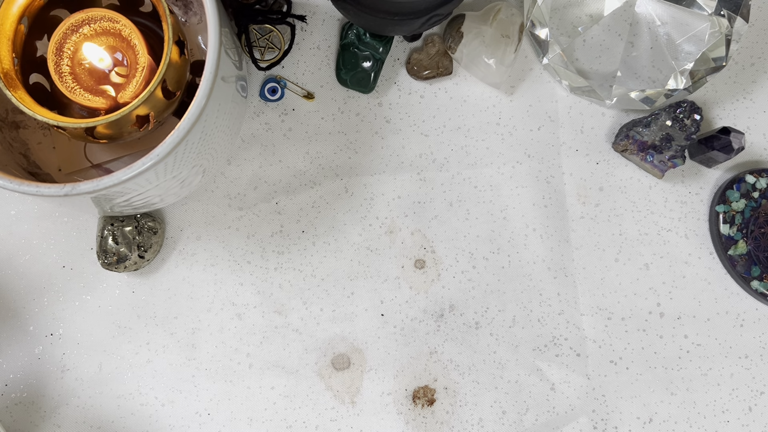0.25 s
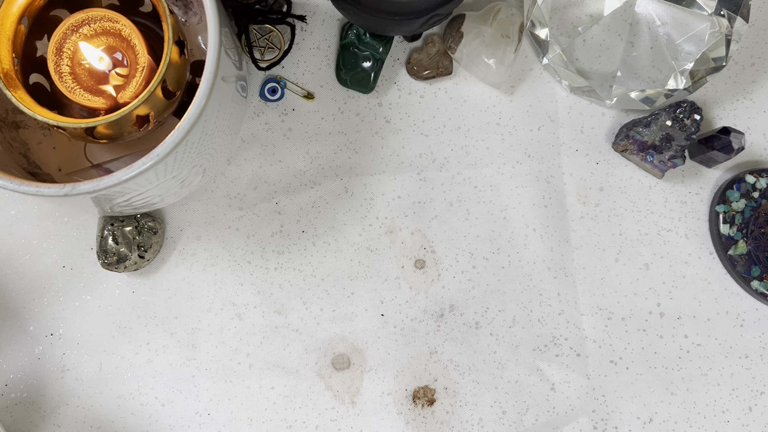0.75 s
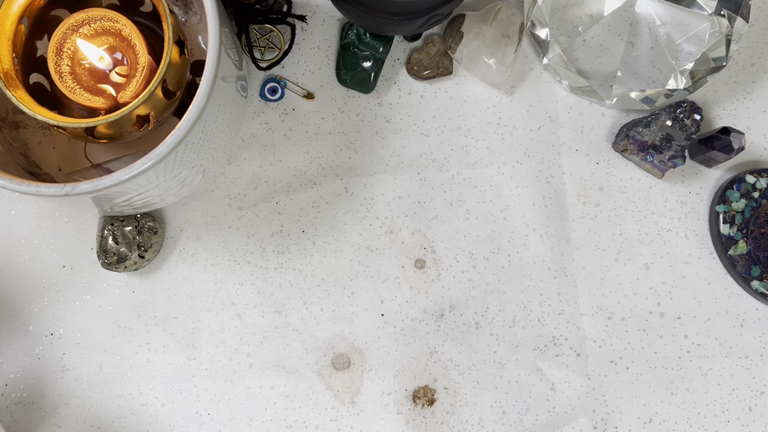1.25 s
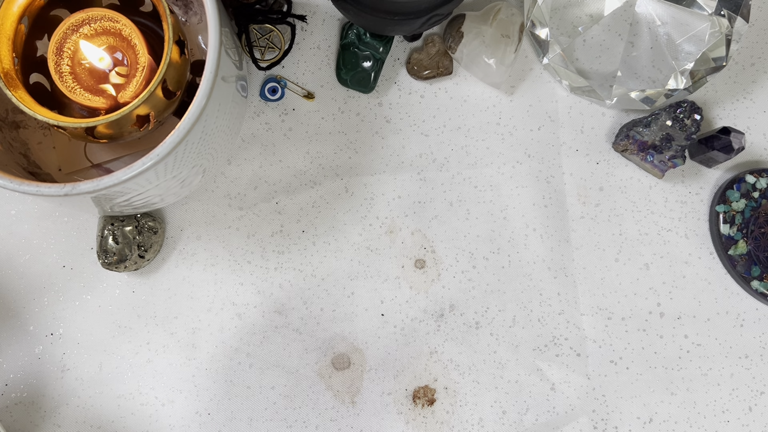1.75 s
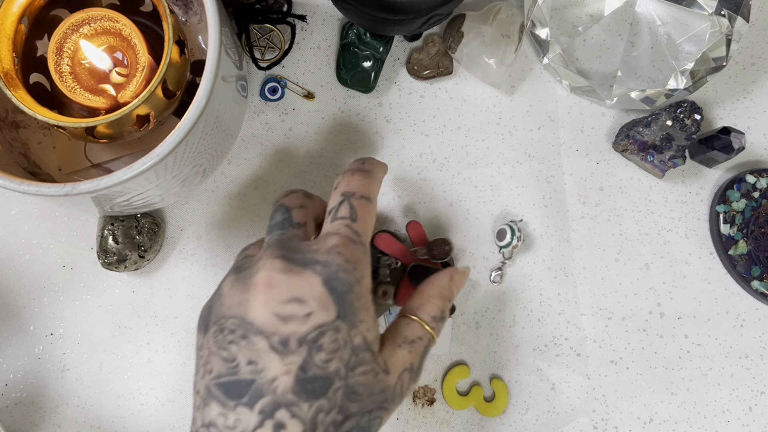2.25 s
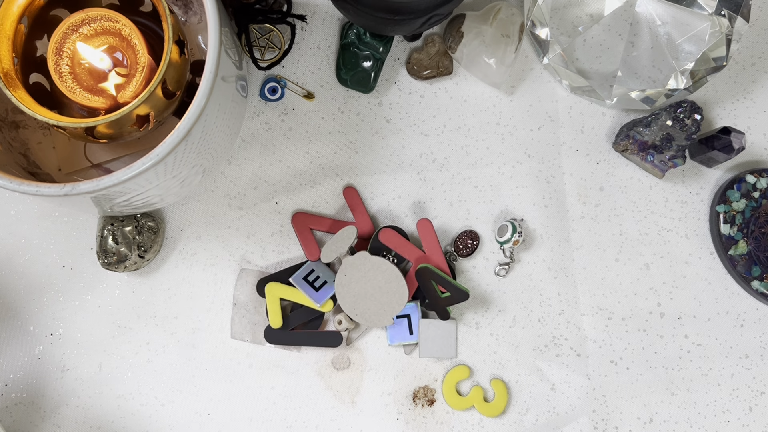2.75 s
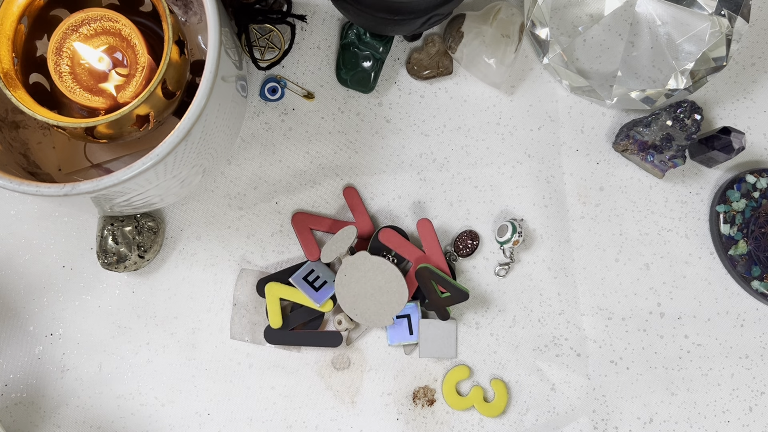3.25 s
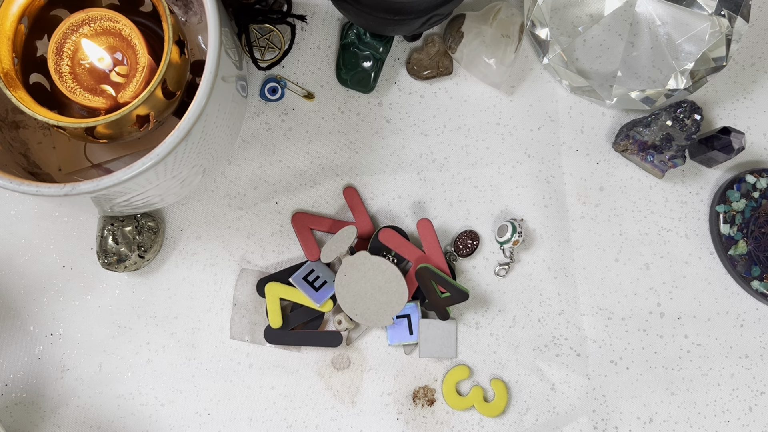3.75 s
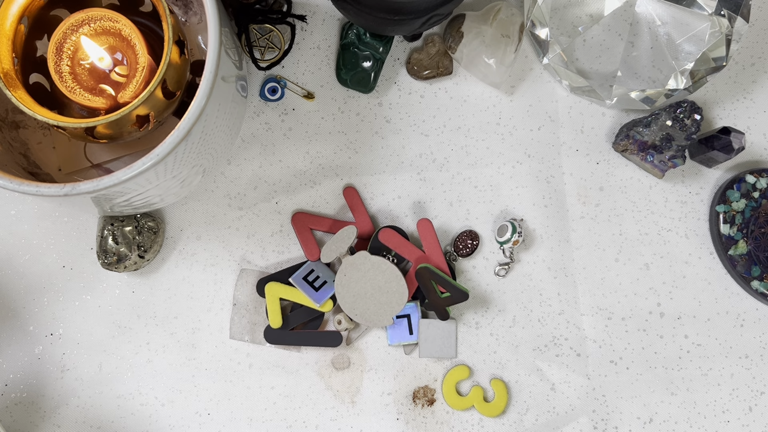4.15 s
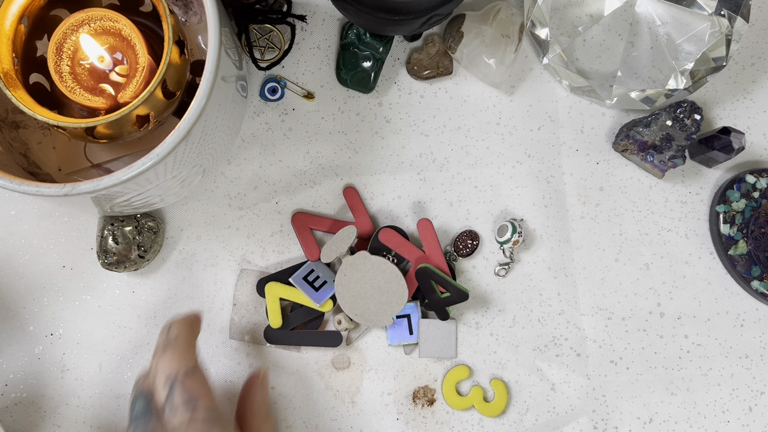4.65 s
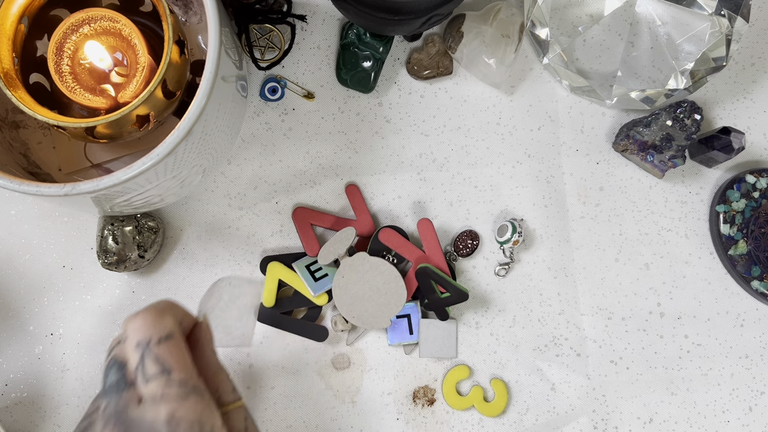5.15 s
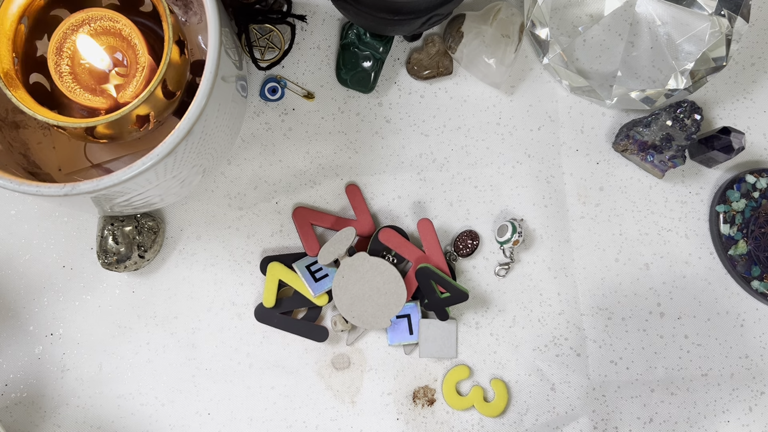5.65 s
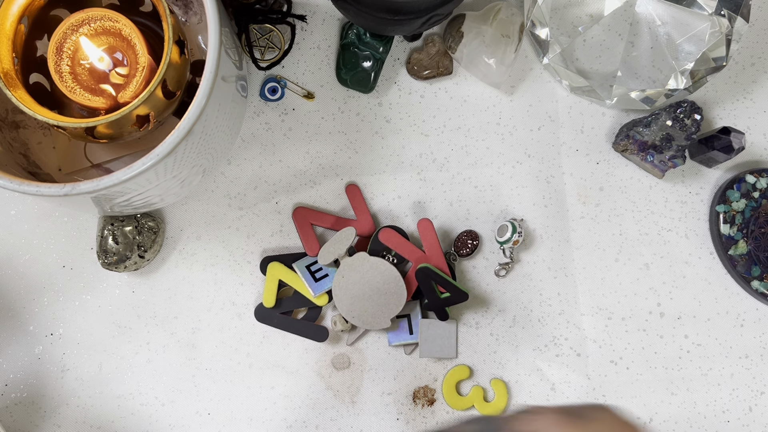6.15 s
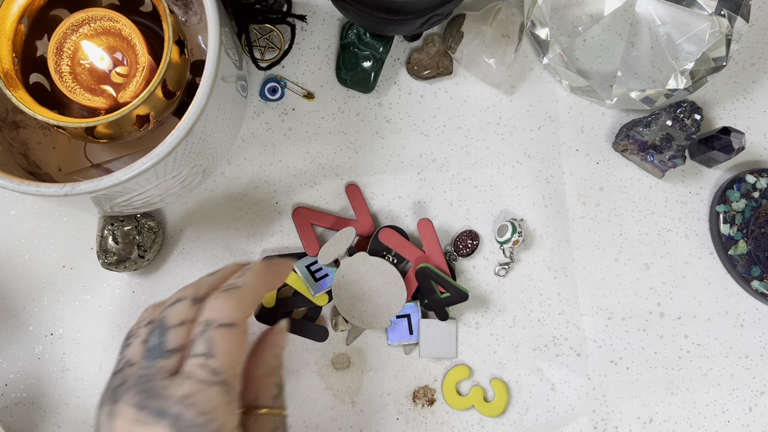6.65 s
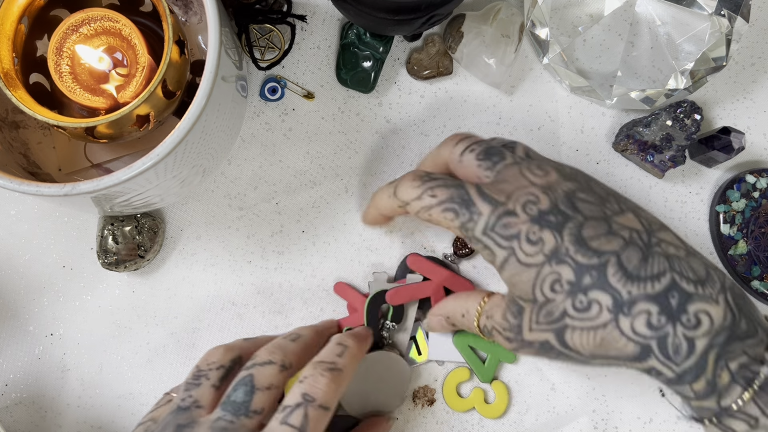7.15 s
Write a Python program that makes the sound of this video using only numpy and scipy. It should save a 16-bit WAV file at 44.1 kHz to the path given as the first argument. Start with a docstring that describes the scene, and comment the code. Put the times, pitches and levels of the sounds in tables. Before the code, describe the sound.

Close up in a small room, a hand stirs plastic letters and metal charms in a ringing bowl, bright and dense, thinning into separate clinks. A firm dull knock hits the table and pieces spill with dry clicks and a thin crinkle. Faint bowl clinks follow, then a short metallic clatter. A piece slides softly aside, and finally both hands spread the pile with clicks and low rubbing. Close stereo microphone, faint hum.

```python
"""Stirring letters and charms

A hand stirs plastic letters and metal charms in a ringing bowl, knocks down on a hard table and lets a handful go.
Charms clink in the bowl, a metal piece clatters down, a tile is slid aside and both hands spread the pile.
Clicks and noise bursts ring damped modes; sliding is dense random slips; rubbing is coloured noise.
A small room with a hum, a close stereo microphone."""
import sys
import numpy as np
from scipy import signal
from scipy.fft import rfft, irfft, next_fast_len
from scipy.io import wavfile

SR = 44100
rng = np.random.default_rng(int(sys.argv[2]) if len(sys.argv) > 2 else 0)


def master(y):
    """Save y as 16-bit WAV."""
    cut = np.clip(np.atleast_2d(y).T, -1, 1)
    pcm = np.round(cut * 32767)  # scale
    wavfile.write(sys.argv[1], SR, pcm.astype(np.int16))


N = 325714
TIME = np.arange(N) / SR


def from_db(db):
    """Decibels to gain."""
    return 10 ** (np.asarray(db) / 20)


def rms_one(x):
    """Scale to rms 1."""
    return x / np.sqrt(np.mean(x ** 2) + 1e-20)


def peak_at(x, db):
    """Scale to a peak level."""
    return from_db(db) * x / np.abs(x).max()


def at_hz(points, hz):
    """Read a table on a log-frequency axis."""
    knots, values = np.transpose(points)
    return np.interp(np.log(hz + 1e-3), np.log(knots), values)


def add(out, start_s, sound):
    """Mix a sound in at a time."""
    i = max(int(start_s * SR), 0)
    out[i:i + len(sound)] += sound[:max(N - i, 0)]


def butter(x, order, hz, kind="low"):
    """Butterworth filter."""
    return signal.sosfilt(signal.butter(order, hz, kind, fs=SR, output="sos"), x)


def colour(x, points):
    """Causal (minimum-phase) filter with the given dB response."""
    size = 2 * next_fast_len(N // 2 + 4096)
    log_gain = np.log(from_db(at_hz(points, np.fft.rfftfreq(size, 1 / SR))))
    cepstrum = irfft(log_gain)
    # fold onto positive time
    cepstrum[1:size // 2] *= 2
    cepstrum[size // 2 + 1:] = 0
    return irfft(rfft(x, size) * np.exp(rfft(cepstrum)))[..., :N]


def tilt(x, tilt_db):
    """Split at 5 kHz: lower part down by twice tilt_db, upper part up by as much."""
    low = butter(x, 1, 5000)
    return low * from_db(-2 * tilt_db) + (x - low) * from_db(2 * tilt_db)


def ring(x, hz, t60_s):
    """Two-pole resonator: a unit click sets a decaying sine of height 1 ringing."""
    radius = from_db(-60 / (t60_s * SR))
    w = 2 * np.pi * hz / SR
    return signal.lfilter([0, np.sin(w)], [1, -2 * radius * np.cos(w), radius ** 2], x + 1e-18)


def burst(t60_s, length_s):
    """A crack of noise that dies away."""
    t = TIME[:int(length_s * SR)]
    return rng.standard_normal(len(t)) * from_db(-60 * t / t60_s)


def contacts(per_s, spread_db):
    """Random tiny collisions; strength in dB is exponential, most weak and a few strong."""
    sizes = from_db(spread_db * np.minimum(rng.exponential(1, N), 4))
    signs = rng.choice([-1, 1], N)
    return sizes * signs * (rng.random(N) < per_s / SR)


def flutter(per_s, depth_db):
    """A gain that wanders at random."""
    knots = rng.standard_normal(1024)
    return from_db(depth_db * np.interp(TIME * per_s, np.arange(len(knots)), knots))


def stroke(start_s, end_s, attack_s, fade_db_per_s):
    """An envelope that rises, holds to the end and then fades."""
    rise = np.clip((TIME - start_s) / attack_s, 0, 1)
    return rise * from_db(-fade_db_per_s * np.maximum(TIME - end_s, 0))


# room air spectrum: [hz, level_db]
AIR_COLOUR = [(15, -53.5), (25, -26.5), (41, -10.5), (64, -12), (78, -5.5), (97, -22), (394, -34.5),
              (489, -36), (531, -35), (988, -47), (1190, -49), (1480, -51.5), (2220, -46), (2760, -52.5),
              (16000, -59.5)]


def room_tone(air_db=-65, side_db=-5, hum_db=-66):
    """Low building rumble, a wavering hum and faint hiss."""
    mid, side = (rms_one(colour(rng.standard_normal(N), AIR_COLOUR)) for _ in range(2))
    side = butter(side, 1, 300, "high")
    air = mid + from_db(side_db) * side * [[1], [-1]]
    hum = np.sqrt(2) * np.sin(2 * np.pi * 59.5 * TIME) * flutter(per_s=6, depth_db=2.5)
    return from_db(air_db) * air + from_db(hum_db) * hum


# stirring vigour: [time_s, level_db]
STIR = [(0.0, -37), (0.048, -37), (0.14, -43.5), (0.202, -39), (0.484, -46.5), (0.854, -48), (0.92, -58.5)]
# plastic rattle spectrum: [hz, level_db]
PLASTIC_COLOUR = [(150, -38.5), (400, -12.5), (900, -12.5), (1800, -1.5), (2600, -4.5), (4500, -4.5),
                  (6500, -1.5), (9000, 0), (16000, -6)]
# small charm modes: [pitch_hz, level_db, t60_s]
CHARMS = [(6410, -8.5, 0.058), (7160, -3.5, 0.015), (7600, 0.5, 0.016), (7930, -5, 0.012),
          (8124, -7.5, 0.0043), (9300, -4, 0.0067), (11690, 1, 0.022), (11260, -10.5, .02),
          (14600, -1, 0.0072), (15550, -25, 0.0029)]
# bowl modes: [pitch_hz, level_db, t60_s]
BOWL = [(400, -19, .9), (964, -9, .16), (1766, -3, .12), (2790, -5, .12), (3950, -2, .11), (5243, -3, .11),
        (5905, -10, .1), (6690, -5, .1), (7133, -5, .1), (8180, -5, .11), (11670, -5, .09)]
SETTLE_DB_PER_S, REST_S, REST_DB_PER_S = 14.5, 1.21, 210   # after the last STIR point, then coming to rest
LETTERS_DB, BOWL_DB = 4.5, -13   # above the vigour
JINGLE_START_DB, JINGLE_DB_PER_DB = -30.5, 1.5   # charms' first level, dB lost per dB of vigour


def stirring(crack_db=-3):
    """Clumped letter collisions ring briefly, each at its own pitch; charms jingle and the bowl sings along."""
    time_s, level_db = np.transpose(STIR)
    settle_db = SETTLE_DB_PER_S * np.maximum(TIME - time_s[-1], 0)
    rest_db = REST_DB_PER_S * np.maximum(TIME - REST_S, 0)
    vigour = from_db(np.interp(TIME, time_s, level_db) - settle_db - rest_db)

    clicks = contacts(per_s=3500, spread_db=3.0) * flutter(per_s=120, depth_db=1.0)
    pitches_hz = np.linspace(1400, 15000, 26)
    dealt = rng.integers(0, len(pitches_hz), N)
    pieces = sum(ring(clicks * (dealt == k), hz, t60_s=0.004) for k, hz in enumerate(pitches_hz))
    rattle = rms_one(pieces) + from_db(crack_db) * clicks / clicks.std()
    letters = vigour * rms_one(colour(rattle, PLASTIC_COLOUR))

    jingle = sum(from_db(db) * rms_one(ring(contacts(per_s=450, spread_db=6.0), hz, t60_s))
                 for hz, db, t60_s in CHARMS)
    charms = (vigour / vigour[0]) ** JINGLE_DB_PER_DB * rms_one(jingle)
    bowl = vigour * rms_one(sum(from_db(db) * ring(clicks, hz, t60_s) for hz, db, t60_s in BOWL))
    return from_db(LETTERS_DB) * letters + from_db(JINGLE_START_DB) * charms + from_db(BOWL_DB) * bowl


# ringing charms: (pitch_hz, t60_s)
LOW_CHARM, MID_CHARM, HIGH_CHARM, TINY_CHARM = (7170, 0.043), (11600, 0.033), (12160, 0.21), (14930, 0.135)
# struck charms: [start_s, peak_db, charm]
PINGS = [(.002, -21, LOW_CHARM), (.107, -23.5, HIGH_CHARM), (.157, -21, HIGH_CHARM),
         (.262, -26.5, HIGH_CHARM), (0.291, -22, TINY_CHARM), (0.3212, -25, MID_CHARM),
         (0.371, -27, HIGH_CHARM), (0.645, -26, LOW_CHARM), (0.698, -22.5, LOW_CHARM),
         (0.8012, -28.5, LOW_CHARM), (0.915, -31.5, LOW_CHARM), (0.9402, -28, MID_CHARM),
         (1.111, -26, LOW_CHARM), (1.1343, -28, MID_CHARM), (3.377, -46, LOW_CHARM),
         (3.7713, -56.5, MID_CHARM), (3.8242, -50.5, MID_CHARM), (3.9051, -36.5, LOW_CHARM),
         (3.941, -38.5, MID_CHARM)]


def pings(crack=0.07, partner_db=-18, partner_ratio=1.8, rebound=.1, rebound_t60_s=0.023):
    """A struck charm rebounds quickly: a crack, one main mode and a weaker partner above or below it."""
    out = np.zeros(N)
    for start_s, peak_db, (hz, t60_s) in PINGS:
        click = signal.unit_impulse(SR // 2) + rebound * burst(rebound_t60_s, length_s=1)[:SR // 2]
        partner_hz = hz * partner_ratio if hz < 9500 else hz / partner_ratio
        main = peak_at(ring(click, hz, t60_s), 0)
        partner = peak_at(ring(click, partner_hz, t60_s / 2), partner_db)
        noise = crack * burst(0.01, length_s=.5)[:len(click)]
        add(out, start_s, peak_at(main + partner + noise, peak_db))
    return out


# charms buzzing together: [start_s, end_s, rms_db, pitch_hz]
BUZZES = [(0.206, 0.335, -38.5, 14750), (0.935, 0.961, -35, 7560), (0.97, 1.057, -48.5, 7530),
          (0.985, 1.05, -51, 11300), (3.212, 3.29, -54, 5770), (3.284, 3.35, -61.5, 11700),
          (3.878, 3.95, -55, 7140), (3.891, 3.956, -58.5, 11230), (7.301, 7.35, -54, 9300)]


def buzzes(t60_s=0.015):
    """Charms in loose contact chatter into one damped mode."""
    out = np.zeros(N)
    clicks = contacts(per_s=13000, spread_db=8.0)
    for start_s, end_s, rms_db, hz in BUZZES:
        run = clicks[int(start_s * SR):int(end_s * SR)]
        swell = signal.windows.tukey(len(run), .5)
        add(out, start_s, from_db(rms_db) * rms_one(ring(run, hz, t60_s) * swell))
    return out


def tap(peak_db, hz, tilt_db, body, body_cycles=34):
    """Plastic on plastic or table: a dry crack and a short ring."""
    crack = burst(0.014, length_s=.1) + 0.08 * burst(0.11, length_s=.1)
    body_ring = rms_one(ring(crack, hz, body_cycles / hz))
    return peak_at(rms_one(tilt(crack, tilt_db)) + body * body_ring, peak_db)


# where a piece is hit: (pitch_hz, tilt_db, ring strength)
FACE, CORNER, EDGE, TIP = (3580, -9, 1.8), (4300, 5, 0.26), (8740, 2.8, 1), (12800, 8, 0.33)
# clear taps: [start_s, peak_db before the high-pass, place]
TAPS = [(0.695, -22.5, EDGE), (0.785, -24.5, EDGE), (0.959, -17, TIP), (1.086, -26.5, TIP),
        (1.172, -26, CORNER), (1.183, -39.5, FACE), (1.196, -30, CORNER), (1.3, -50, CORNER),
        (1.712, -43.5, CORNER), (1.7785, -24.5, TIP), (2.032, -30.5, TIP), (2.091, -37.5, TIP),
        (2.1963, -25.5, FACE), (2.199, -26.5, FACE), (2.3215, -25, CORNER), (2.394, -32, CORNER),
        (3.201, -33, EDGE), (3.493, -42, TIP), (5.809, -42, FACE), (6.8971, -36, FACE),
        (6.982, -29, CORNER), (6.9997, -28.5, EDGE), (7.0624, -37, CORNER), (7.2198, -30.5, EDGE),
        (7.258, -34.5, TIP), (7.2671, -29.5, FACE), (7.321, -28, CORNER), (7.377, -19, CORNER)]
# pieces jostling under the hands: [start_s, end_s, typical peak_db before the high-pass]
JOSTLES = [(2.001, 2.57, -47), (3.148, 3.5, -59.5), (6.931, 7.392, -44)]
JOSTLES_PER_S, JOSTLE_SPREAD_DB, JOSTLE_PITCH_SPREAD = 39, 5, 0.13   # pitch spread as a share


def taps():
    """Clear taps, and fainter ones at random while the hands move the pieces; high-passed."""
    out = np.zeros(N)
    for start_s, peak_db, place in TAPS:
        add(out, start_s, tap(peak_db, *place))
    for start_s, end_s, peak_db in JOSTLES:
        for k, (late, size, pitch, pick) in enumerate(rng.random((40, 4))):
            hit_s = start_s + (k + late) / JOSTLES_PER_S
            hz, tilt_db, body = (FACE, FACE, CORNER, TIP)[int(4 * pick)]
            hit_db = peak_db + JOSTLE_SPREAD_DB * (2 * size - 1)
            hit_hz = hz * (1 + JOSTLE_PITCH_SPREAD * (2 * pitch - 1))
            add(out, hit_s, tap(hit_db, hit_hz, tilt_db, body) * (hit_s < end_s))
    return butter(out, 2, 900, "high")


# pieces skittering on the bowl: [start_s, peak_db, length_s (a third of the skitter's t60), tilt_db]
BOWL_HITS = [(0.791, -37, 0.14, 2), (0.969, -22.5, 0.0085, 6.5), (2.692, -39, 0.054, 1.5),
             (2.783, -56.5, 0.02, 0), (3.101, -52, 0.017, -1), (3.201, -44.5, 0.011, 2.5)]


def bowl_hits(crack=.4, skitter=.1):
    """A first touch and a run of smaller ones excite the bowl's modes."""
    out = np.zeros(N)
    for start_s, peak_db, length_s, tilt_db in BOWL_HITS:
        touch = signal.unit_impulse(SR) + skitter * burst(3 * length_s, length_s=1)[:SR]
        modes = sum(from_db(db) * np.sqrt(t60_s) * rms_one(ring(touch, hz, t60_s)) for hz, db, t60_s in BOWL)
        noise = crack * rms_one(burst(0.25, length_s=1)[:SR])
        add(out, start_s, peak_at(tilt(rms_one(modes) + noise, tilt_db), peak_db))
    return out


# dull blows on the table: [start_s, peak_db, cutoff_hz]
KNOCKS = [(1.812, -25, 3370), (1.941, -13, 1590), (1.985, -27, 519), (2.181, -35, 1290),
          (2.3052, -34.5, 1280), (2.381, -37.5, 590), (3.097, -53.5, 470), (4.081, -39.5, 199.7),
          (4.988, -55, 443), (5.808, -50.5, 808.5), (7.108, -38, 444)]
# table top modes: [pitch_hz, level_db, t60_s]
TABLE = [(155, -21, 0.036), (260.2, -7, 0.027), (339, -9.5, .16), (412, -7, 0.12), (511.4, -5, 0.048),
         (632.3, -4.5, 0.027), (889, -12, 0.036), (1032, -11.5, 0.069), (1483, -1, 0.012),
         (1810, -5.5, 0.037), (2370, -3, 0.029), (3430, -3.5, 0.0093)]


def knocks():
    """A soft contact is a low-passed blow on the table's modes."""
    out = np.zeros(N)
    for start_s, peak_db, cutoff_hz in KNOCKS:
        click = signal.unit_impulse(SR // 2)
        modes = sum((-1) ** k * from_db(db) * ring(click, hz, t60_s)
                    for k, (hz, db, t60_s) in enumerate(TABLE))
        blow = modes + burst(0.082, length_s=.5)[:len(click)]
        add(out, start_s, peak_at(butter(blow, 3, cutoff_hz), peak_db))
    return out


# pieces and skin sliding: [start_s, end_s, level_db]
SLIDES = [(1.987, 2.62, -65), (2.08, 2.447, -64), (3.12, 3.387, -62), (3.468, 3.513, -65),
          (3.848, 3.995, -71.5), (4.733, 4.817, -70), (4.911, 5.138, -64.5), (5.086, 5.137, -58),
          (5.392, 5.434, -73.5), (5.772, 5.944, -61), (6.452, 6.488, -69), (6.85, 7.08, -62),
          (7.016, 7.39, -64.5)]
# sliding spectrum: [hz, level_db]
SLIDE_COLOUR = [(200, -30.5), (600, 10), (1500, 8), (3500, 1), (7000, 1), (13000, -4), (16000, -7.5)]
# crinkling in a closed hand: [start_s, end_s, level_db]
CRINKLES = [(2.14, 2.394, -46.5), (7.253, 7.39, -55)]
SLIDE_TILT_DB = 5
CRINKLE_ATTACK_S, CRINKLE_FADE_DB_PER_S = 0.0067, 400.5


def slides(edge_share=.3, tick_db=-9):
    """Friction is an uneven hiss of tiny slips with plastic ticks; in the closed hand, a thin crinkle."""
    grains = contacts(per_s=3000, spread_db=4.5) * flutter(per_s=45, depth_db=2.5)
    ticks = sum(ring(contacts(per_s=22, spread_db=2.0), hz, t60_s=.008)
                for hz in (1900, 2700, 3600, 4600, 5800))
    slips = rms_one(colour(grains, SLIDE_COLOUR)) + from_db(tick_db) * rms_one(ticks)
    out = np.zeros(N)
    for start_s, end_s, level_db in SLIDES:
        run = slips[int(start_s * SR):int(end_s * SR)]
        push = signal.windows.tukey(len(run), 2 * edge_share)
        add(out, start_s, from_db(level_db) * push * rms_one(tilt(run, SLIDE_TILT_DB)))
    grip = sum(from_db(db) * stroke(start_s, end_s, CRINKLE_ATTACK_S, CRINKLE_FADE_DB_PER_S)
               for start_s, end_s, db in CRINKLES)
    crinkle = rms_one(ring(contacts(per_s=1100, spread_db=0.0), hz=15290, t60_s=0.0064))
    return out + grip * flutter(per_s=50, depth_db=6.5) * crinkle


# hand drags: [start_s, end_s, deep_db, rub_db], both before the trims in rumble
DRAGS = [(2.306, 2.397, -46.5, -46.5), (4.676, 4.821, -47, -49.5), (4.799, 5.012, -47, -60.5),
         (5.123, 5.254, -59, -83), (6.853, 7.004, -63, -53.5), (7.069, 7.39, -41, -43)]
# deep shake spectrum: [hz, level_db]
DEEP_COLOUR = [(25, -47.5), (52, 24.5), (100, 10), (160, 2.5), (300, -54.5)]
# rubbing spectrum: [hz, level_db]
RUB_COLOUR = [(100, -8), (180, -2), (340, 7), (520, -1), (800, -18), (2000, -54)]
DEEP_ATTACK_S, DEEP_FADE_DB_PER_S = 0.054, 153
RUB_ATTACK_S, RUB_SAG_DB_PER_S, RUB_FADE_DB_PER_S = 0.031, 22, 168


def rumble(deep_trim_db=1.0, rub_trim_db=-6.5):
    """Dragging hands shake the table top: the rub rises first and eases off, the deep shake swells slower."""
    deep = rub = 0
    for start_s, end_s, deep_db, rub_db in DRAGS:
        sag_db = RUB_SAG_DB_PER_S * np.maximum(TIME - start_s, 0)
        deep = deep + from_db(deep_db) * stroke(start_s, end_s, DEEP_ATTACK_S, DEEP_FADE_DB_PER_S)
        rub = rub + from_db(rub_db - sag_db) * stroke(start_s, end_s, RUB_ATTACK_S, RUB_FADE_DB_PER_S)
    shake = rms_one(colour(rng.standard_normal(N), DEEP_COLOUR))
    judder = rms_one(colour(contacts(per_s=500, spread_db=4.5), RUB_COLOUR))
    return from_db(deep_trim_db) * deep * shake + from_db(rub_trim_db) * rub * judder


# a metal piece lands, chatters, lands again: [start_s, force_db, chatter length_s]
CLATTER = [(4.0514, -21.5, .004), (4.068, -22.5, 0.0064), (4.121, -41.5, 0.0069), (4.1467, -30.5, 0.004)]
# crack spectrum: [hz, level_db]
CLATTER_COLOUR = [(100, -11), (200, -34), (400, -9), (900, -2.5), (1800, -7.5), (2250, 10), (3400, 0),
                  (4700, 5), (6500, 3), (8500, 2), (12000, -4.5), (16000, -20.5)]
# metal modes: [pitch_hz, energy share_db, t60_s]
METAL = [(861, -27, .16), (980, -26, .16), (1543, -8.5, .07), (2180, -18, .06), (2312, -15, .06),
         (2552, -20, .16), (3231, -17, .13), (3370, -22, .17), (3930, -24, .14), (4033, -15, .12),
         (4672, -13.5, .06), (4845, -18, .16), (5592, -19, .1), (5877, -13.5, .08), (6440, -18, .13),
         (7520, -15, .11), (7835, -12, .08), (8680, -22, .1), (11460, -26, .12), (12135, -25, .1)]
CLATTER_ATTACK_S, CLATTER_FADE_DB_PER_S = .001, 299


def clatter(crack_db=-4.0, ring_db=-1.0):
    """Runs of fast bounces: each makes a broad crack and pumps the metal's modes."""
    force = sum(from_db(db) * stroke(start_s, start_s + length_s, CLATTER_ATTACK_S, CLATTER_FADE_DB_PER_S)
                for start_s, db, length_s in CLATTER)
    cracks = force * rms_one(colour(contacts(per_s=12000, spread_db=1.0), CLATTER_COLOUR))
    rings = sum(from_db(db) * rms_one(ring(cracks, hz, t60_s)) for hz, db, t60_s in METAL)
    return from_db(crack_db) * cracks + from_db(ring_db) * cracks.std() * rings


# room decay: [hz, t60_s]
ROOM_T60 = [(150, 0.63), (400, 0.23), (1500, 0.34), (5000, 0.31), (12000, 0.13)]
# left-right correlation of the tail: [hz, correlation]
ROOM_LIKENESS = [(150, 0.92), (320, 0.71), (550, 0.06), (1200, .2), (5000, 0.18)]


def room(x, gap_s=0.0018):
    """Diffuse tail of unit energy, most alike at both ports in the bass and shortest in the top treble."""
    t, tail = TIME[:SR // 2], 0
    edges_hz = np.geomspace(110, 17000, 11)
    for low_hz, high_hz in zip(edges_hz, edges_hz[1:]):
        mid, side = butter(rng.standard_normal((2, len(t))), 2, [low_hz, high_hz], "band")
        hz = np.sqrt(low_hz * high_hz)
        alike = np.clip(at_hz(ROOM_LIKENESS, hz), -1, 1)
        noise = np.sqrt(1 + alike) * mid + np.sqrt(1 - alike) * side * [[1], [-1]]
        tail = tail + noise * from_db(-60 * t / at_hz(ROOM_T60, hz))
    tail = tail * (t > gap_s)
    tail = tail / np.sqrt((tail ** 2).sum() / 2)
    return signal.fftconvolve(x[None], tail, axes=1)[:, :N]


# left lead over right: [hz, phase_rad]
PORT_PHASE = [(300, 0.17), (1500, 1.2), (4000, 0.01), (7500, 0.44), (12000, 1.6), (16000, 0.28)]


def ports(x):
    """Direct sound reaches the two ports slightly out of step."""
    size = next_fast_len(N + SR // 10)
    turn = np.exp(.5j * at_hz(PORT_PHASE, np.fft.rfftfreq(size, 1 / SR)))
    return irfft(rfft(x, size) * np.array([turn, turn.conj()]), size)[:, :N]


LEFT_LOUDER_DB = 1   # the pieces lie a little to the left


def scene():
    """Each source goes straight to the ports and, by its own share, into the room."""
    bowl = stirring() + pings() + buzzes() + bowl_hits()
    table = taps() + slides()
    knock, low, metal = knocks(), rumble(), clatter()
    wet = from_db(-10.5) * (bowl + table) + from_db(-9) * knock + from_db(-8.5) * metal + from_db(-3.0) * low
    balance = from_db([[LEFT_LOUDER_DB / 2], [-LEFT_LOUDER_DB / 2]])
    direct = ports(bowl + table + metal) * balance + knock + low
    return direct + room(wet) + room_tone()


# microphone response: [hz, level_db]
MIC_COLOUR = [(9200, 0), (9700, -7), (10200, -23.5), (10800, -4.5), (11500, 1), (12700, 2), (13400, -4),
              (13950, -27), (14500, 0), (15000, -4)]
STOPBAND_HZ = 17200   # 70 dB down from here up


def record(dry):
    """The microphone has two dips in the treble; the top is cut."""
    top_cut = signal.cheby2(14, 70, STOPBAND_HZ, fs=SR, output="sos")
    return signal.sosfilt(top_cut, colour(dry, MIC_COLOUR))


dry = scene()
out = record(dry)
master(out)
```